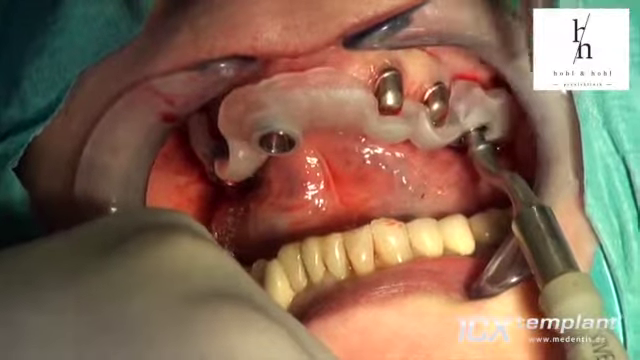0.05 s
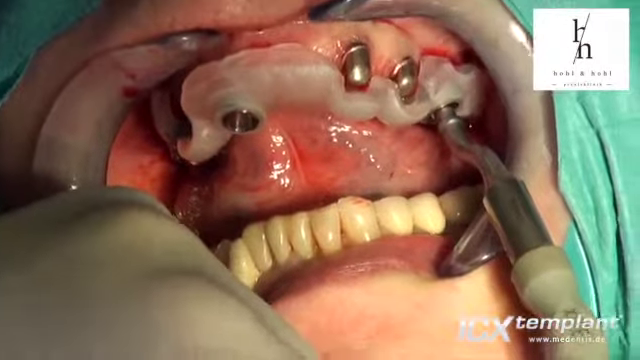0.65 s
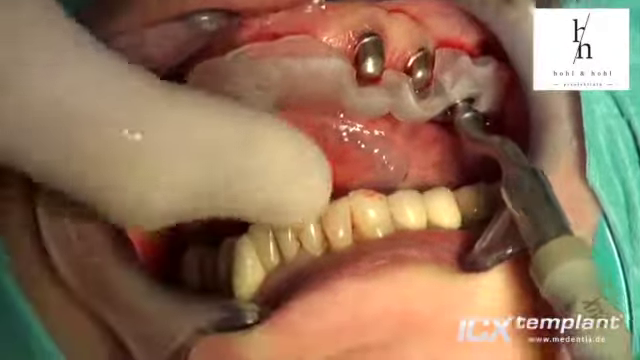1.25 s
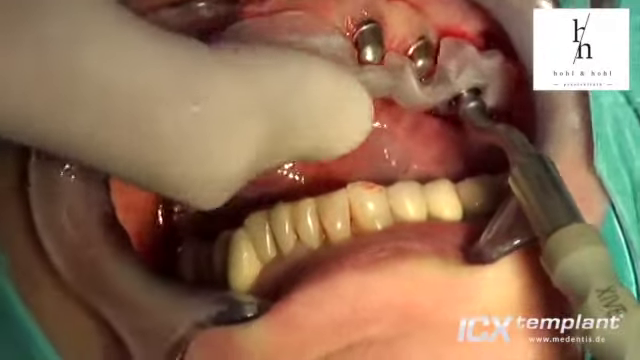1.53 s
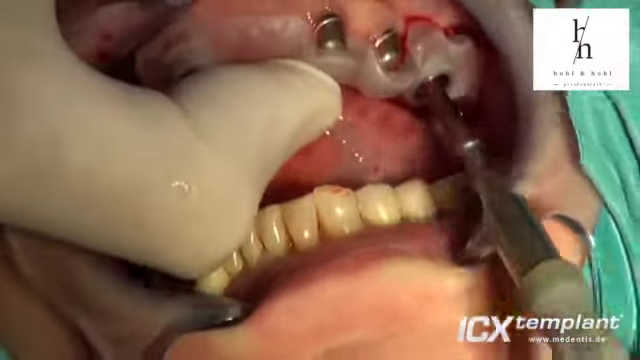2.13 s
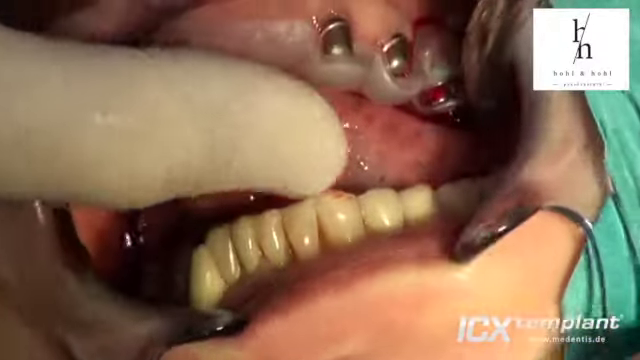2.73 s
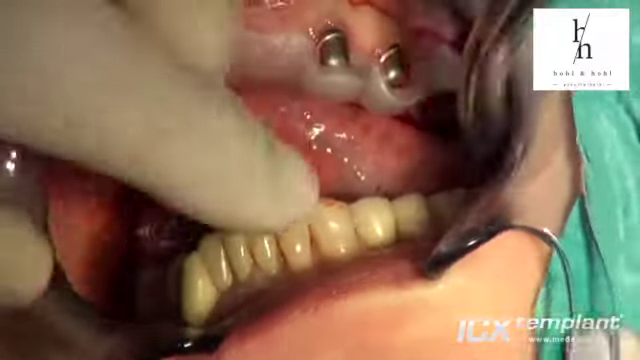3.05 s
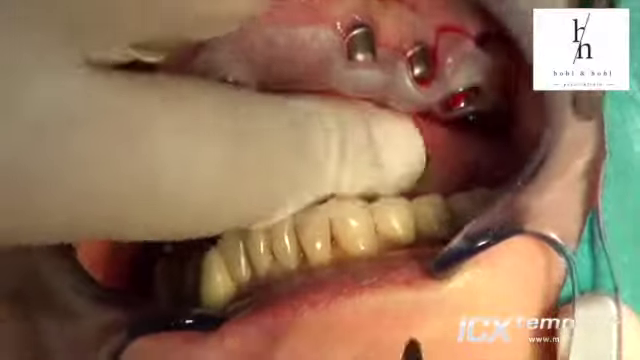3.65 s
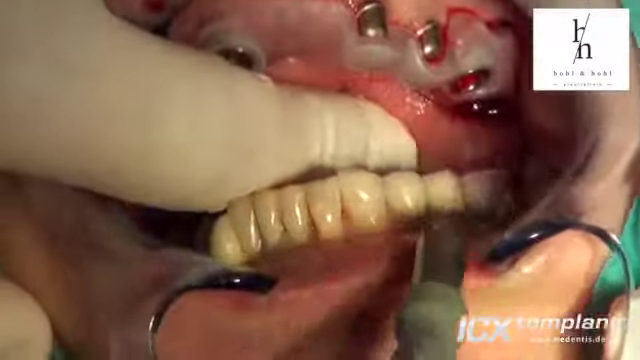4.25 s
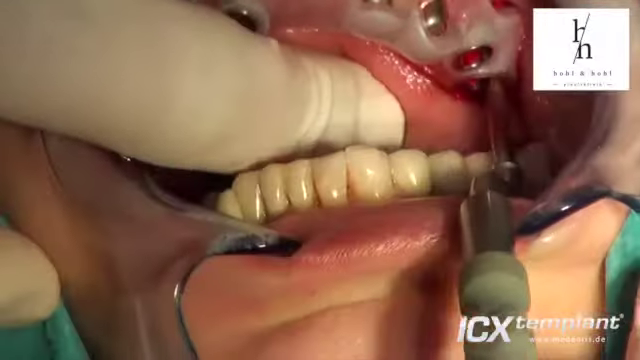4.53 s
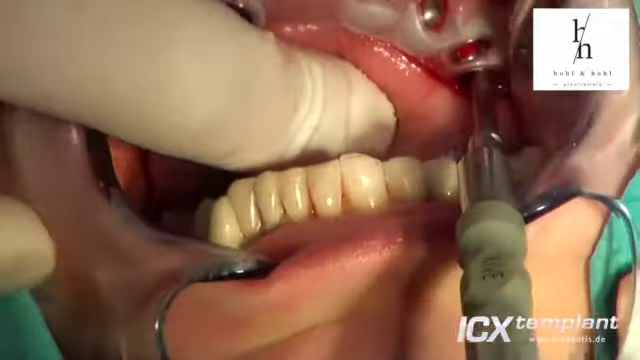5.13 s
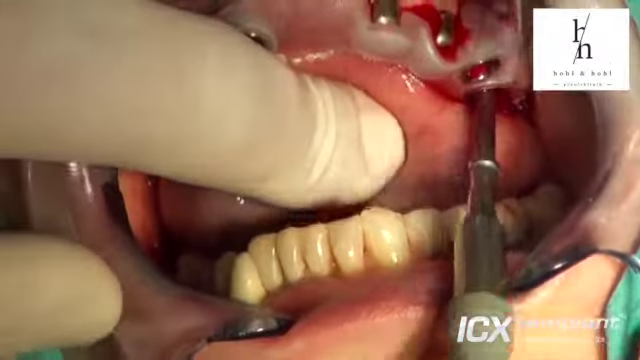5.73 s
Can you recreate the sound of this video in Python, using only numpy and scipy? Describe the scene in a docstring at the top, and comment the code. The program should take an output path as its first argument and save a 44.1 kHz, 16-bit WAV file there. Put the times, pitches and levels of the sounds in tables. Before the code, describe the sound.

A surgical suction tube hisses throughout, close to a mouth in a small treatment room. It opens with a loud, crackling slurp, while an instrument clacks sharply about four times in the first 0.8 seconds. The flow thins to an airy hiss with shifting high tones. At 1.5 seconds comes one dull, hollow thump, followed by small pops near 1.9 and 2.3 seconds. A wet slurp swells at 2.6 seconds, with a brief wavering whistle and a tick around 2.8. The tip seals and the hiss chokes off near 2.9 seconds, bursts back slurping at 3.15, chokes again at 3.5 and reopens with a tick and slurp at 3.6. Lighter hiss follows, with a faint glove rub around 4.3 seconds. Another slurp rises at 5 seconds, cuts off from 5.3 to 5.6 with tiny ticks, then resumes wetly to the end.

```python
"""Surgical suction, close up

One microphone close to a mouth in a small treatment room. Air hisses in the suction tube's resonances; each dip
into liquid swells to a crackling slurp, and three times tissue seals the tip and chokes it. An instrument
clacks, drops pop, the tip ticks as it unsticks from tissue, a glove rubs on the lip, and a dull thump sets the
small room's low modes ringing."""
import sys
import numpy as np
from scipy import signal
from scipy.io import wavfile
from scipy.ndimage import uniform_filter1d, minimum_filter1d, map_coordinates

SR = 44100
rng = np.random.default_rng(int(sys.argv[2]) if len(sys.argv) > 2 else 0)


def materialize(psi):
    """Save the field psi as 16-bit PCM at rate SR to the path in sys.argv[1].

    A 1-D psi becomes a single channel; in a 2-D psi each row is a channel.
    """
    bounded = np.clip(np.atleast_2d(psi).T, -1, 1)
    quanta = np.round(bounded * 32767).astype(np.int16)
    wavfile.write(sys.argv[1], SR, quanta)


N = 263972
TIME = np.arange(N) / SR

# tone of the quiet room: (frequency [Hz], relative density [dB])
ROOM_SPECTRUM = [(25, -17), (70, -17.5), (170, 0), (260, 2.5), (450, -6.5), (780, 0.5), (1200, -5.5),
                 (3000, -15), (6000, -13.5), (9000, -33), (15000, -40)]
# decay of the room: (frequency [Hz], t60 [s])
ROOM_DECAY = [(100, 0.44), (500, 0.37), (2000, 0.34), (5000, 0.21), (14000, 0.078)]
# soft knocks of the thump: (time [s], relative level [dB])
THUMP_KNOCKS = [(1.079, -34.5), (1.125, -40), (1.384, -33.5), (1.522, -15.5), (1.529, -7), (1.546, -11),
                (1.556, -13.5), (1.572, -14), (1.696, -20)]
# the room's low modes that the knocks set ringing: (frequency [Hz], relative level [dB], t60 [s])
THUMP_ROOM_MODES = [(48.5, -29, 1), (169.2, -7, 0.23), (237, -7.5, 0.21), (265, -5.5, 0.16), (351, 3, 0.23),
                    (431, 8, 0.11), (567, 5.5, 0.052), (610, -26, 0.18), (762, 2, 0.17), (867, -1, 0.088),
                    (1030, -19, 0.17)]
# short pops and ticks: (time [s], dry peak [dB], pitch [Hz], width [Hz], length [s])
POPS_AND_TICKS = [(1.907, -14.5, 4420, 350, 0.0037), (2.34, -16.5, 2570, 1100, 0.0031),
                  (2.874, -11.5, 3950, 2240, 0.011), (3.589, -20, 6060, 4000, 0.0083),
                  (5.357, -23, 9900, 2980, 0.008), (5.457, -37, 8400, 300, 0.0042),
                  (5.587, -27, 12800, 4000, .008)]
# contacts of the instrument: (time [s], dry peak [dB], length [s])
INSTRUMENT_CLACKS = [(0.03, 4.5, 0.0016), (0.2113, -0.5, 0.0016), (0.392, -17, 0.0017),
                     (0.42, -15.5, 0.033), (0.5761, -2.1, 0.0016), (0.7591, -1.5, 0.0026)]
# its modes: (frequency [Hz], width [Hz], relative level [dB])
INSTRUMENT_MODES = [(770, 310, -15), (1170, 500, -8), (1736, 216, -4), (2930, 590, 0.5), (4350, 280, -3),
                    (4670, 390, -5.5), (5650, 260, -11.5), (7210, 650, -11.5), (11500, 760, -24.5)]
# whistle of the nearly sealed tip: (time [s], pitch [Hz], level [dB])
WHISTLE_PATH = [(2.78, 1480, -57), (2.792, 1543, -21), (2.802, 1646, -23), (2.82, 1567, -25),
                (2.836, 1742, -26), (2.852, 1604, -33), (2.875, 1640, -51), (3.06, 1630, -65)]
# broad rush of air under the resonances: (frequency [Hz], relative density [dB])
RUSH_SPECTRUM = [(60, -22), (160, -9), (350, 2), (800, 3.5), (1500, -9), (3000, 4.5), (6000, -0.5),
                 (9000, -6), (14000, -11)]
# tube resonances: (frequency [Hz], width [Hz], gain drawing air [dB], gain drawing liquid [dB])
TUBE_MODES = [(1350, 460, -3.5, -16.5), (1491, 310, -8, -7.5), (1783, 360, 0.5, -17), (2313, 334, 9, -3),
              (2664, 620, 6, -0.5), (2968, 326, -1, -5.5), (3684, 300, -4, -7), (4385, 237, 7, -8.5),
              (5260, 250, -4, -9.5), (6013, 220, -3.5, -11.5), (6530, 560, -3.5, -12), (7450, 390, -6, -25),
              (8040, 290, -10, -14.5), (9560, 350, -8, -23.5), (9910, 1600, -29, -13),
              (11210, 410, -6.5, -14.5), (12090, 600, -23, -14), (12620, 550, -9, -21),
              (13900, 970, -14.5, -16.5)]
# the jet at the rim makes the tube sing: (start [s], end [s], pitch [Hz], glide [Hz/s], boost [dB])
JET_SINGING = [(0.27, 0.363, 6000, 24, 15), (0.426, .74, 4400, -4, 16), (0.98, 1.28, 5790, 2266, 14.5),
               (1.303, 1.575, 4400, 0, 6.5), (2.55, 2.773, 4100, 1500, 7), (2.61, 2.783, 5220, 0, 5),
               (2.63, 2.753, 8160, 0, 23), (2.764, 2.945, 9520, 0, 13), (3.714, 3.816, 6000, -1, 18),
               (3.865, 4.186, 3660, 2, 15), (4.366, 4.912, 7770, 1526, 22), (4.67, 4.92, 6160, 0, 14),
               (4.976, 5.225, 4380, 0, 12.5), (5.092, 5.39, 9500, -32, 35), (5.106, 5.27, 6000, 0, 20.5),
               (5.794, 6.1, 5430, -2, 17)]
# the hovering tip draws plain air: (time [s], hiss [dB], spray [dB], air column's round trip [ms])
HOVERING = [(.35, -38, -48, .49), (1.1, -40.5, -52.5, .46), (1.58, -38.5, -42.5, 0.334),
            (2.25, -42.5, -50, 0.367), (3.75, -34.5, -37, 0.49), (3.97, -34.5, -38.5, 0.56),
            (4.22, -40, -48.5, 0.432), (4.52, -40.5, -36, .5), (4.86, -38, -41.5, .43)]
# dips into liquid: (deepest from [s], until [s], way in [s], way out [s], gurgle [dB], hiss [dB],
#   spray [dB], round trip [ms], hollow pitch [Hz], its boost [dB], sizzle pitch [Hz])
DIPS = [(0.0, 0.047, .05, 0.27, -27, -14.5, -32.5, 0.11, 3100, 11, 12700),
        (1.412, 1.606, 0.25, 0.26, -45, -32, -50.5, 0.34, 2320, 10, 8070),
        (2.59, 2.754, 0.31, 0.086, -38, -17, -34.5, 0.17, 2860, 2.5, 12150),
        (2.796, 2.818, 0.068, 0.069, -57, -19, -22, 0.13, 3000, 5, 12550),
        (2.867, 2.876, 0.024, 0.084, -53, -33, -28, 0.21, 2970, 22, 12200),
        (3.157, 3.413, 0.014, 0.094, -27.5, -16, -35, 0.14, 2460, 6.5, 11600),
        (3.602, 3.622, 0.053, .17, -25, -14, -36, 0.22, 2320, 8, 12900),
        (5.027, 5.192, .17, 0.076, -29.5, -19.5, -32, 0.2, 2260, 13, 12580),
        (5.612, 5.654, .03, 0.16, -31.5, -18, -32.5, 0.12, 2420, -7.5, 12550),
        (5.694, 5.77, 0.067, 0.87, -25.5, -21, -33.5, 0.22, 2220, 14, 12560)]
# tissue seals the tip: (shut [s], starts to open [s], closing time [s])
TISSUE_SEALS = [(2.934, 3.134, .05), (3.507, 3.586, 0.089), (5.285, 5.584, 0.069)]


def from_db(db):
    """Decibels to gain."""
    return 10 ** (np.asarray(db) / 20)


def rms_one(x):
    """Scale to unit power."""
    return x / np.sqrt(np.mean(x ** 2) + 1e-20)


def levelled(x, size=2600):
    """Even out the slow level, keep the grain."""
    return x / np.sqrt(np.abs(uniform_filter1d(x * x, size)) + 1e-20)


def in_time(rows):
    """One curve over time for each column after the first."""
    times, *columns = np.transpose(rows)
    return [np.interp(TIME, times, column) for column in columns]


def at_hz(points, hz):
    """Read a table on a log-frequency axis."""
    frequencies, values = np.transpose(points)
    return np.interp(np.log(hz), np.log(frequencies), values)


def drift(rate_hz):
    """Smooth random wander with spread 1."""
    r = np.exp(-40 * np.pi * rate_hz / SR)
    slow = signal.lfilter([1], [1, -2 * r, r * r], rng.standard_normal(N // 20 + 4002))[4000:]
    return np.interp(np.arange(N) / 20, np.arange(len(slow)), rms_one(slow))


def band(x, hz, width_hz, order=2):
    """Band-pass around a centre."""
    edges = np.clip([hz - width_hz / 2, hz + width_hz / 2], 10, .48 * SR)
    return signal.sosfilt(signal.butter(order, edges, "band", fs=SR, output="sos"), x + 1e-18)


def ring(clicks, hz, t60):
    """Each click sets a decaying sine ringing."""
    r, w = np.exp(-np.log(1000) / (t60 * SR)), 2 * np.pi * hz / SR
    return signal.lfilter([0, np.sin(w)], [1, -2 * r * np.cos(w), r * r], clicks + 1e-18)


def noise_bands(size):
    """Half-octave bands of unrelated noise, as (Hz, samples)."""
    return [(hz, band(rng.standard_normal(size), hz, hz * .35)) for hz in 30 * 2 ** np.arange(0, 9.5, .5)]


def coloured(spectrum):
    """Steady noise with a given spectrum, rms 1."""
    return rms_one(sum(from_db(at_hz(spectrum, hz)) * x for hz, x in noise_bands(N)))


def burst(length_s, modes, size=4096, lead_s=0.0025):
    """A brief chatter of contact rings each mode; peak 1."""
    t = (np.arange(size) - size / 2) / SR + lead_s
    contact = np.exp(-2 * (t / length_s) ** 2)
    x = sum(from_db(db) * rms_one(band(contact * rng.standard_normal(size), hz, width))
            for hz, width, db in modes)
    return x / np.abs(x).max()


def add(track, s, x):
    """Mix a short sound in, centred on a time."""
    at = round(s * SR) - len(x) // 2 + np.arange(len(x))
    inside = (at >= 0) & (at < N)
    track[at[inside]] += x[inside]


def room_tone(level_db=-50.5):
    """The faint, steady noise of the room."""
    return from_db(level_db) * coloured(ROOM_SPECTRUM)


def room(x, wet_db):
    """Direct sound at the microphone, then a diffuse tail whose treble dies first."""
    t = TIME[:SR // 2]
    tail = sum(noise * np.exp(-np.log(1000) * t / at_hz(ROOM_DECAY, hz))
               for hz, noise in noise_bands(len(t)))
    tail *= np.clip((t - .004) / 0.0012, 0, 1)   # first reflections after 4 ms
    return x + from_db(wet_db) * signal.fftconvolve(x, tail / np.linalg.norm(tail))[:N]


def glove(at_s=4.263, fade_s=0.23, level_db=-44):
    """A dull, unsteady rub of rubber on the lip, swelling and fading once."""
    swell = np.exp(-((TIME - at_s) / fade_s) ** 2)
    return swell * from_db(level_db + 2 * drift(25)) * rms_one(band(rng.standard_normal(N), 680, 250))


def thump(ring_db=-11, shudder_db=-14, shudder_s=0.053, lowpass_hz=950):
    """Soft knocks set the room's low modes ringing and leave a brief shudder."""
    knocks, modes = np.zeros(N), np.zeros(N)
    for s, db in THUMP_KNOCKS:
        knocks[round(s * SR)] = from_db(db)
    for hz, db, t60 in THUMP_ROOM_MODES:
        strikes = knocks * rng.choice([-1, 1], N)   # random signs, so the modes sound evenly on average
        modes += from_db(db) * band(ring(strikes, hz, t60), hz, hz, order=1)
    dying = signal.lfilter([1], [1, -np.exp(-1 / (shudder_s * SR))], knocks + 1e-18)
    shudder = from_db(shudder_db) * dying * rms_one(band(rng.standard_normal(N), 545, 580))
    soften = signal.butter(4, lowpass_hz, fs=SR, output="sos")
    return signal.sosfilt(soften, from_db(ring_db) * modes + shudder)


def pops_and_ticks():
    """Short pops and ticks: drops, and the tip unsticking from tissue."""
    out = np.zeros(N)
    for s, db, hz, width, length in POPS_AND_TICKS:
        add(out, s, from_db(db) * burst(length, [(hz, width, 0)]))
    return out


def clacks():
    """Short, hand-damped contacts of the instrument."""
    out = np.zeros(N)
    for s, db, length in INSTRUMENT_CLACKS:
        add(out, s, from_db(db) * burst(length, INSTRUMENT_MODES))
    return out


def whistle(waver_hz=22, rough_db=5.0):
    """A wet slit at the rim sounds one unsteady tone."""
    hz, level_db = in_time(WHISTLE_PATH)
    sounding = (TIME > WHISTLE_PATH[0][0]) & (TIME < WHISTLE_PATH[-1][0])
    level = sounding * from_db(level_db + rough_db * drift(53))
    phase = 2 * np.pi * np.cumsum(hz + waver_hz * drift(80)) / SR
    return level * np.sqrt(2) * np.sin(phase)


def lift(start, end, way_in, way_out):
    """Height of the tip in one dip: 0 at its deepest, 1 at the surface."""
    return np.clip(np.maximum((start - TIME) / way_in, (TIME - end) / way_out), 0, 10)


def sealing(opening_s=0.018, slit_before_s=0.022, slit_after_s=0.051):
    """Tissue shuts the tip, leaving only a slit just before and after: (opening, slit), both 0-1."""
    opening, slit = np.ones(N), np.zeros(N)
    for shut, opens, closing_s in TISSUE_SEALS:
        gap = np.maximum((shut - TIME) / closing_s, (TIME - opens) / opening_s)
        opening = np.minimum(opening, np.clip(gap, 0, 1))
        before = (shut - closing_s - TIME) / slit_before_s
        after = (TIME - opens - opening_s) / slit_after_s
        away = np.maximum(before, after).clip(min=0)
        slit = np.maximum(slit, np.exp(-away ** 2))
    return opening, slit


def flow(hover_gurgle_db=-46.5, swing_db=23.5, skim_db=6, slit_shortens=0.47):
    """Dipping in swells gurgle, hiss and spray and shortens the air column; a seal chokes the flow."""
    hiss_db, spray_db, round_trip_ms = in_time(HOVERING)
    power = from_db([np.full(N, hover_gurgle_db), hiss_db, spray_db]) ** 2
    for start, end, way_in, way_out, gurgle, hiss, spray, dipped_ms, *_ in DIPS:
        height = lift(start, end, way_in, way_out)
        sag = swing_db * height
        skim = skim_db * np.exp(-((height - 0.26) / 0.18) ** 2)   # extra spray when partly dipped
        power += from_db([gurgle - sag, hiss - sag, spray - sag + skim]) ** 2
        round_trip_ms = dipped_ms + (round_trip_ms - dipped_ms) * np.minimum(height, 1)
    opening, slit = sealing()
    slit_boost_db, leak_db = (-1.5, 5, 12), (-68.5, -60, -71)   # gurgle, hiss, spray
    open_db = 10 * np.log10(power) + np.outer(slit_boost_db, slit)
    levels_db = opening * open_db + np.outer(leak_db, 1 - opening)
    return *levels_db, round_trip_ms * (1 - slit_shortens * slit)


def singing_db(hz, reach_hz=270, fade_s=0.095, sizzle_db=8):
    """How much the jet and the liquid around the tip favour the tube mode at this pitch, over time."""
    nearness = lambda centre: np.exp(-((hz - centre) / reach_hz) ** 2)
    boost = np.zeros(N)
    for start, end, start_hz, glide, db in JET_SINGING:
        fade = np.clip(np.minimum(TIME - start, end - TIME) / fade_s + .5, 0, 1)
        boost += db * nearness(start_hz + glide * (TIME - start)) * fade
    for start, end, way_in, way_out, *_, hollow_hz, hollow_db, sizzle_hz in DIPS:
        db = hollow_db * nearness(hollow_hz) + sizzle_db * nearness(sizzle_hz)
        if abs(db) > .1:
            boost += db * np.maximum(1 - lift(start, end, way_in, way_out) ** 2, 0)
    return boost


def air_column(x, round_trip_ms, first_echo=0.67, second_echo=0.11):
    """Echoes invert at the open end: a comb that glides as the column's length changes."""
    lag = round_trip_ms * SR / 1000
    after = lambda trips: map_coordinates(x, [np.arange(N) - trips * lag], order=3)
    return x - first_echo * after(0.914) + second_echo * after(1.98)


def suction(drops_per_s=650, crackle=0.4, dry_flutter_db=1.5, wet_flutter_db=-1.3, waver_db=4.0):
    """Turbulence and shattering drops drive the tube; the louder the flow, the more liquid it carries."""
    gurgle_db, hiss_db, spray_db, round_trip_ms = flow()
    wet = np.clip((hiss_db + 33.5) / 11, 0, 1)
    impacts = (rng.random(N) < drops_per_s / SR) * rng.choice([-1, 1], N)
    sizes = from_db(16.6 * np.minimum(rng.exponential(1, N), 3))
    drops = crackle * wet * rms_one(impacts * sizes)
    tube = np.zeros(N)
    for low_hz, high_hz, level_db in [(0, 1950, gurgle_db), (1950, 7000, hiss_db), (7000, SR, spray_db)]:
        modes = np.zeros(N)   # the modes of one range share its part of the flow's energy
        for hz, width, air_db, liquid_db in TUBE_MODES:
            if low_hz <= hz < high_hz:
                mode_db = air_db + wet * (liquid_db - air_db) + singing_db(hz) + waver_db * drift(7.6)
                drive = rng.standard_normal(N) + drops
                skirt = 0.069 * band(drive, hz, width * 5.94)
                modes += from_db(mode_db) * rms_one(band(drive, hz, width) + skirt)
        tube += from_db(level_db) * levelled(air_column(modes, round_trip_ms))
    flutter_db = dry_flutter_db + wet * (wet_flutter_db - dry_flutter_db)
    flutter = from_db(flutter_db * drift(37))   # slight fast flutter of the hiss
    rush_db = np.minimum(hiss_db - 3.5, -43 + 0.038 * (hiss_db + 18))   # falls away under a seal
    return tube * flutter + from_db(rush_db) * coloured(RUSH_SPECTRUM)


def scene():
    """One microphone close to the mouth, the same on both channels."""
    mono = room(suction(), wet_db=-11.5)
    mono += room(whistle() + pops_and_ticks(), wet_db=-13.5)
    mono += room(clacks(), wet_db=-8)
    mono += room(thump(), wet_db=-12.5)
    mono += glove() + room_tone()
    return np.array([mono, mono])


def record(dry, ceiling=.93, window=129, cutoff_hz=14900):
    """A fast limiter ducks the few peaks that would overload; the top treble is cut."""
    allowed = np.minimum(1, ceiling / (np.abs(dry).max(axis=0) + 1e-9))
    gain = uniform_filter1d(minimum_filter1d(allowed, window), window)
    return signal.sosfilt(signal.ellip(10, .1, 80, cutoff_hz, fs=SR, output="sos"), dry * gain)


dry = scene()
out = record(dry)
materialize(out)
```